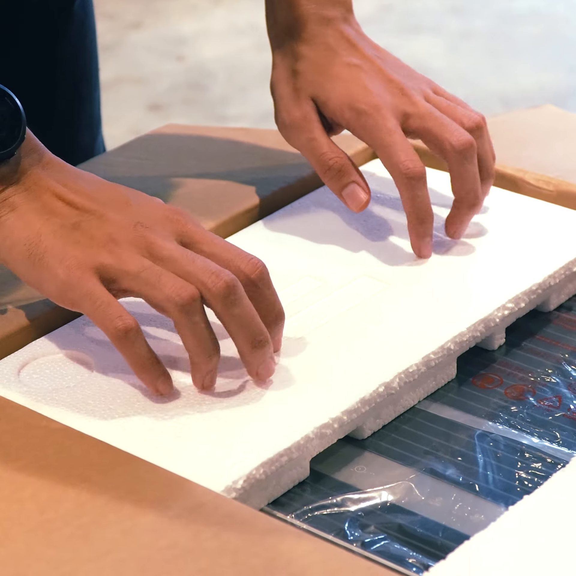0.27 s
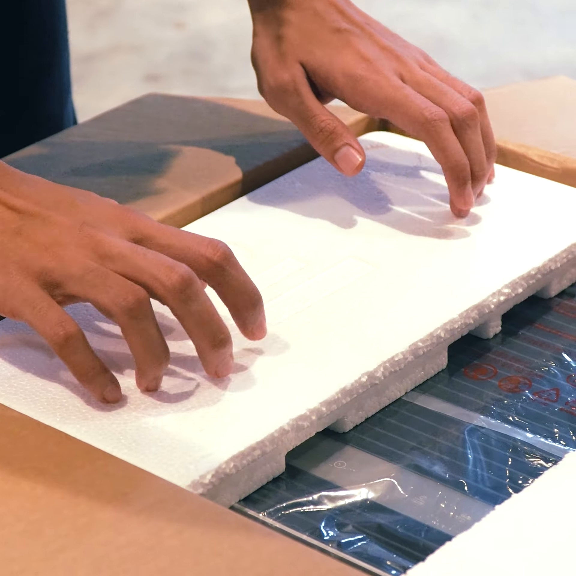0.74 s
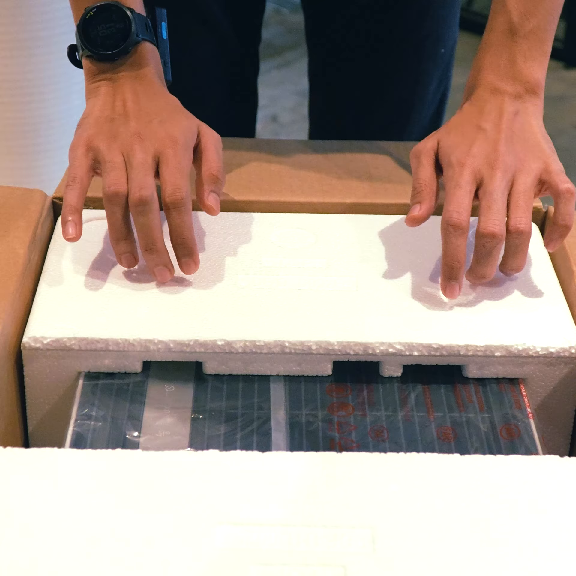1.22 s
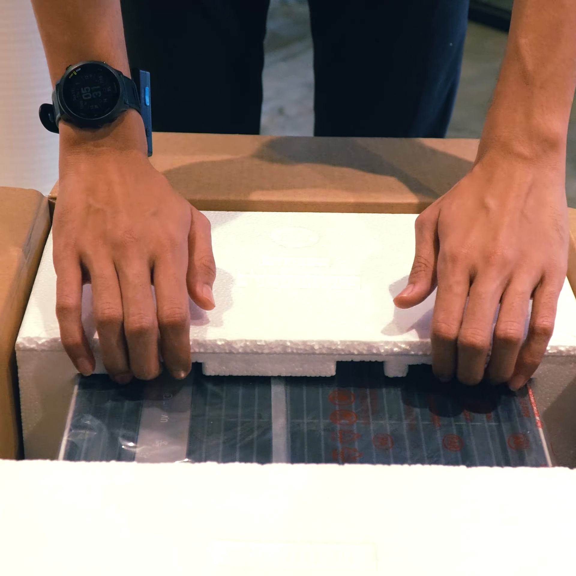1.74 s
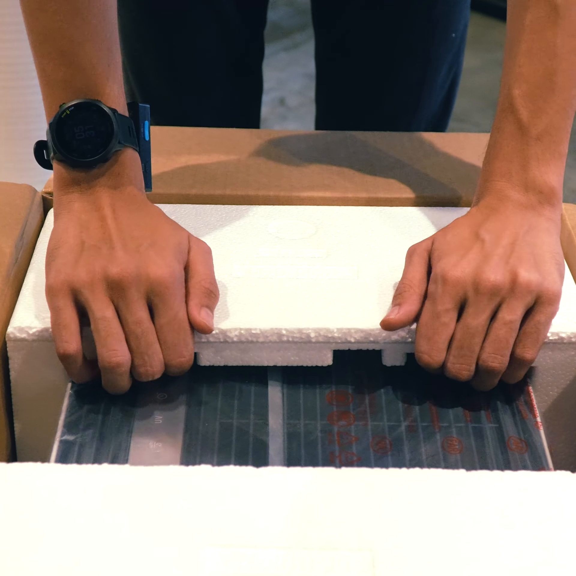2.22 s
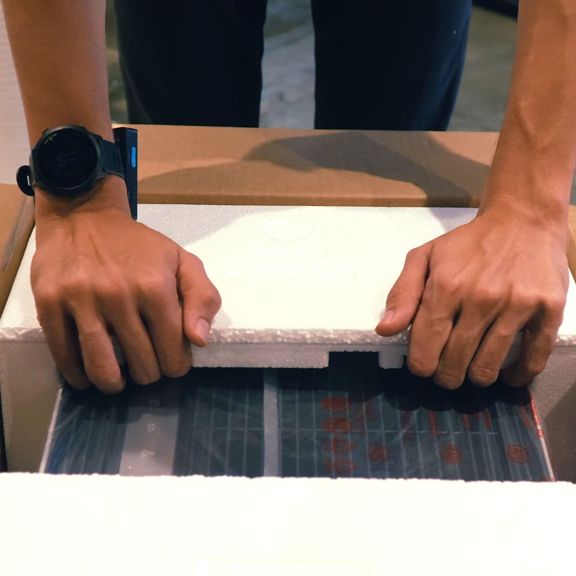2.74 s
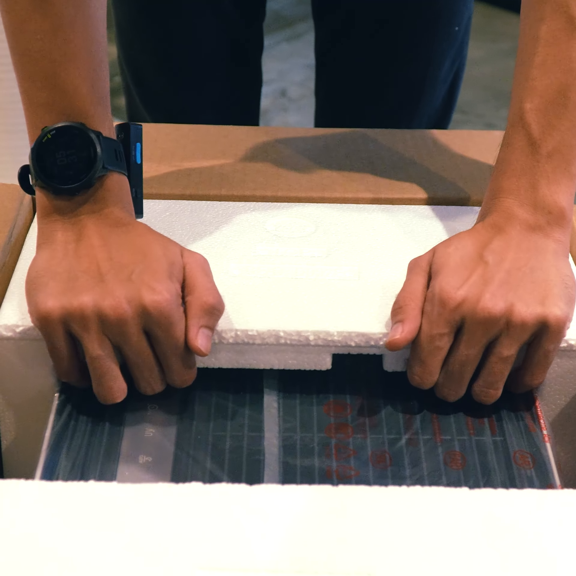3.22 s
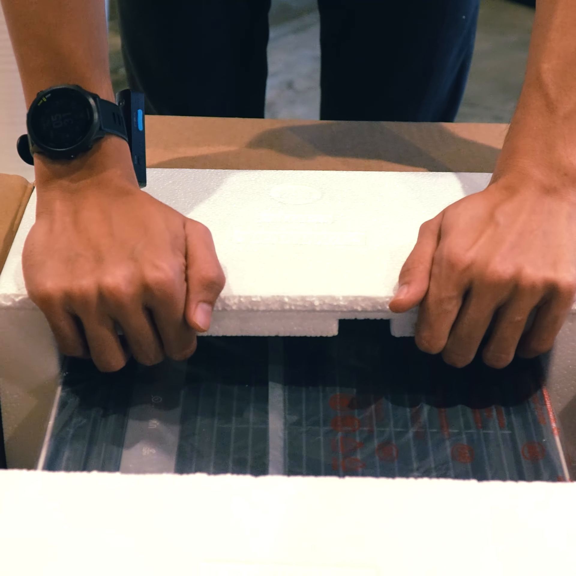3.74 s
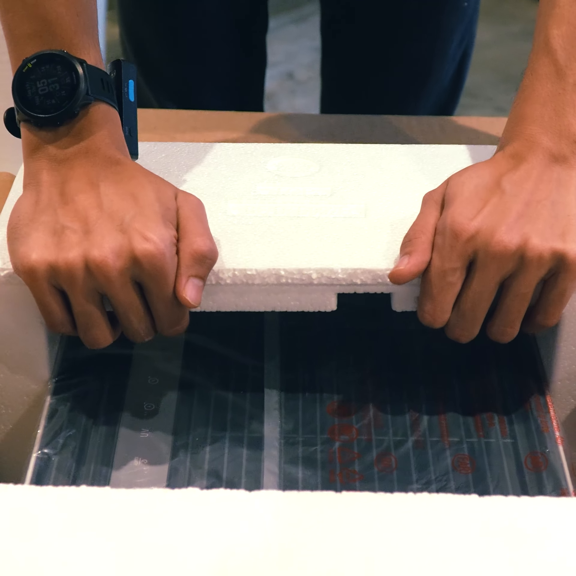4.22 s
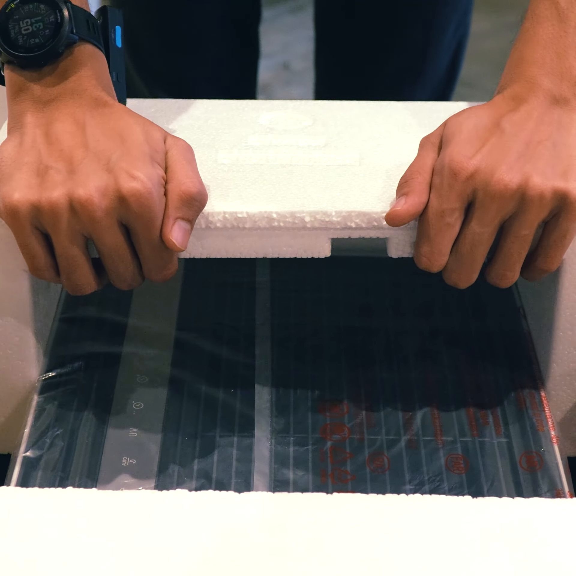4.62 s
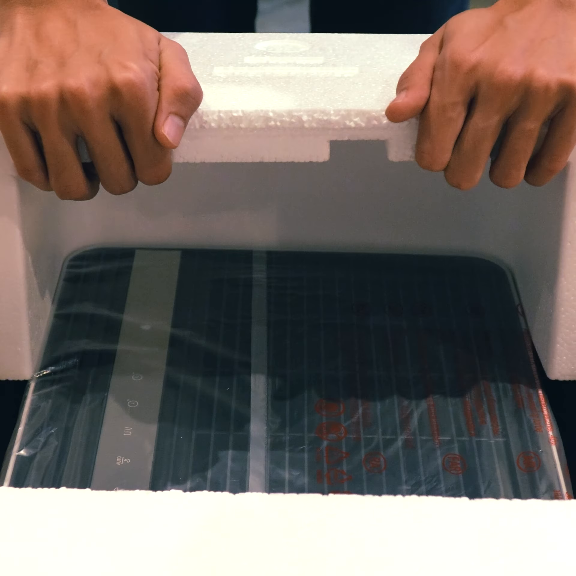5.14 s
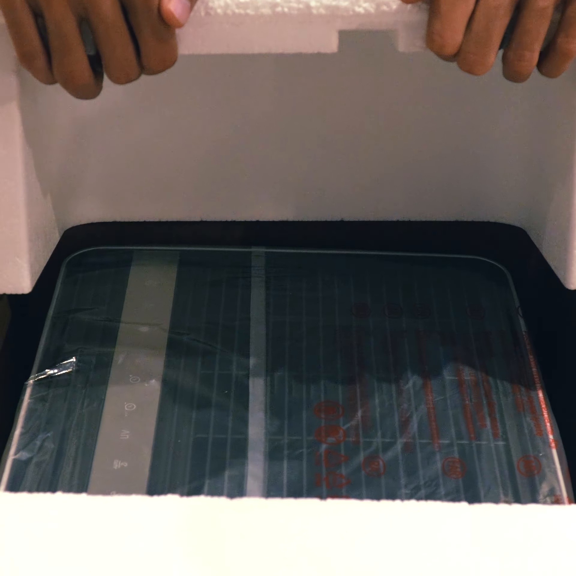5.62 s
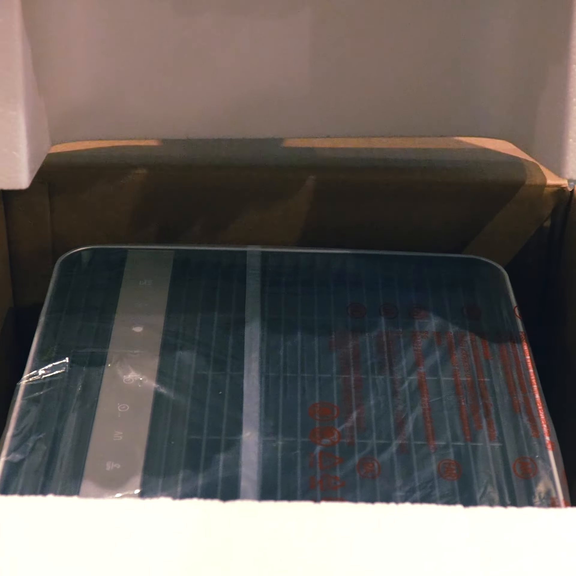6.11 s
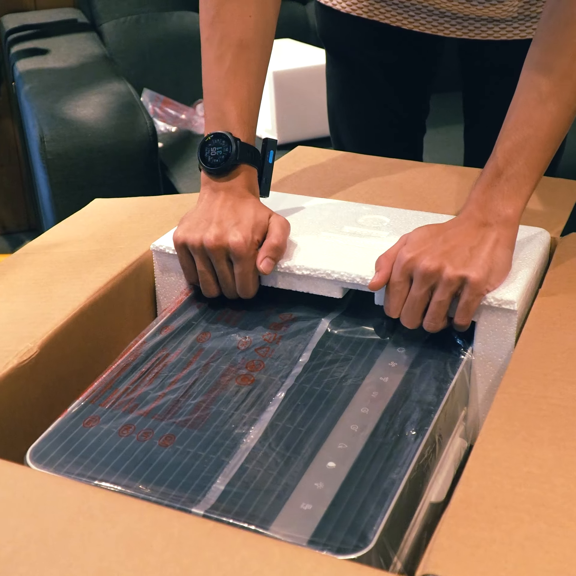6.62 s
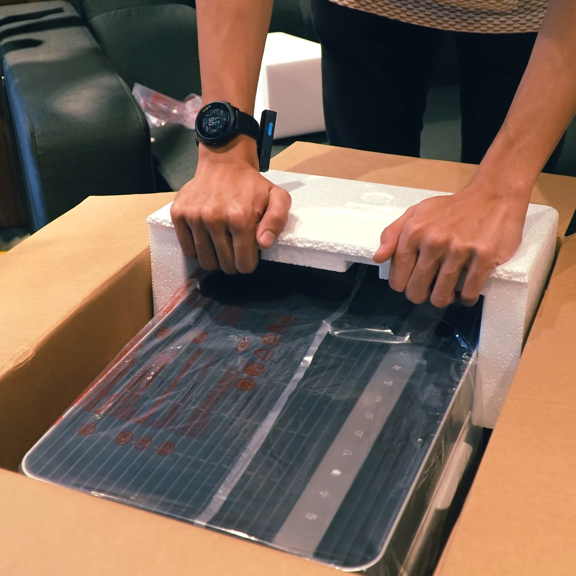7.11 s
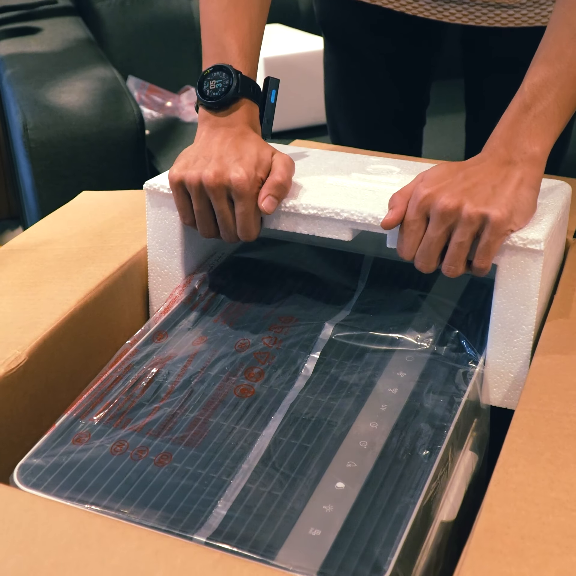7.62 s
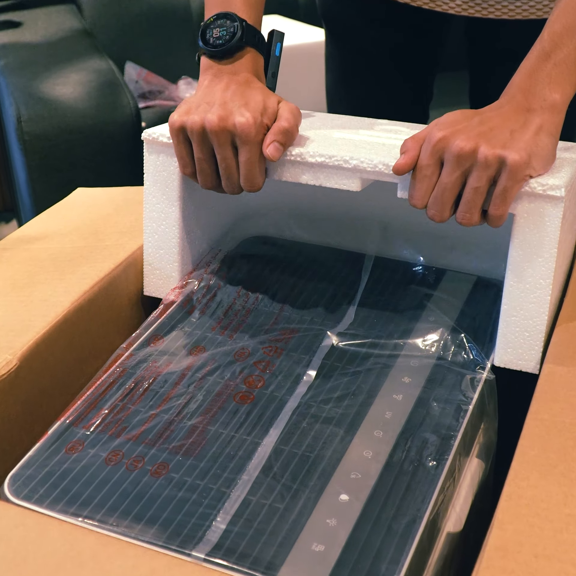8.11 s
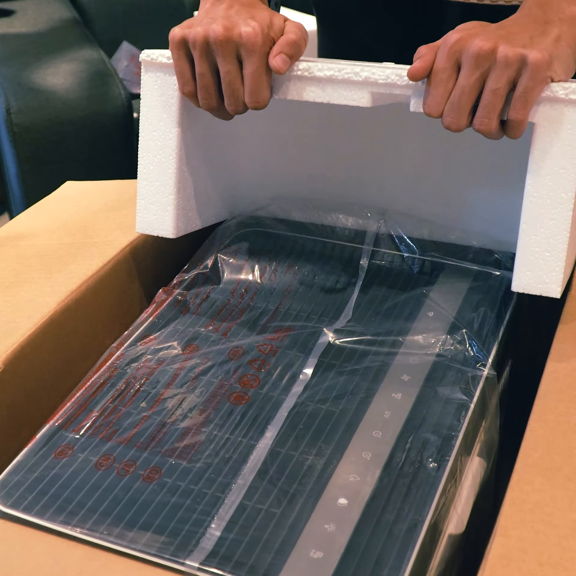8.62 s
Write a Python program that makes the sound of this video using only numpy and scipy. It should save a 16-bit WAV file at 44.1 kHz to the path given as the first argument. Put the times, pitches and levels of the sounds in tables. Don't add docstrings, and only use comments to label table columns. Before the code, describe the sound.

Indoors, close microphone, faint room hum and hiss with a short, slight room tail. From 0.1 to 1.1 s, fingertips drum unevenly on a foam slab: about twenty low, hollow, quickly damped thumps with nail ticks and brief scuffs. Soft box knocks come at 1.2 and 1.45 s. From 1.6 s foam scuffs brightly against cardboard, with a cluster of hard creaks around 2.0-2.4 s and the strongest wall knock at 2.3 s. It thins to small ticks, then a low rubbery groan near 3.1-3.25 s and a sharp squeaky pluck at 3.35 s. A dense, gritty drag hisses, stuttering around 4 s, then steadily until 6.05 s, stopping abruptly. After light creaks at 6.3 s, a second long scrape runs from 6.5 s to the end, with low box knocks at 6.5 and 7.5 s and tiny, very high squeaks around 8.6 s.

```python
import sys
import numpy as np
from scipy import signal
from scipy.fft import rfft, irfft
from scipy.io import wavfile
from scipy.ndimage import uniform_filter1d

SR = 44100
rng = np.random.default_rng(int(sys.argv[2]) if len(sys.argv) > 2 else 0)


def attenuation_scalar(level_db):
    decades = np.asarray(level_db, float) / 20
    return 10 ** decades


def digitize_waveform(pressure):
    field = np.atleast_2d(pressure).T
    bounded = np.clip(field, -1, 1)
    quanta = np.round(bounded * 32767).astype(np.int16)
    wavfile.write(sys.argv[1], SR, quanta)


N = 390726

# frequency in Hz, level in dB.
AIR_SPECTRUM = [(18, -32), (30, -23), (364, -2), (666, -1.5), (1010, 14), (1670, -13), (2060, -13.5),
                (3400, -18), (3980, -21), (5310, -42), (16000, -70)]
# frequency in Hz, t60 in seconds.
ROOM_DECAY = [(100, 0.22), (1000, 0.75), (4000, 0.18), (12000, 0.37)]
# frequency in Hz, level in dB.
CARTON_SPECTRUM = [(30, -21), (55, -2), (85, 0), (120, -3.5), (160, -4), (230, -8.5), (400, -35.5),
                   (1000, -83)]
# time in seconds, level in dB.
SHAKE_LEVEL = [(0.0, -44), (1.19, -44), (1.21, -30), (1.24, -33), (1.33, -46), (1.42, -28.5), (1.43, -26),
               (1.47, -27), (1.48, -35), (1.54, -18), (1.61, -44), (1.66, -33), (1.75, -49), (1.88, -49),
               (1.97, -29.5), (2.08, -51), (2.1, -38), (2.25, -36), (2.29, -17), (2.36, -23), (2.42, -19.5),
               (2.5, -46), (2.62, -44), (2.68, -50), (2.94, -49), (3.18, -42), (3.4, -55), (3.66, -46),
               (3.95, -53), (5.46, -59), (5.62, -49), (6.01, -65), (6.07, -39), (6.13, -56), (6.26, -55),
               (6.36, -40), (6.46, -38), (6.53, -23.5), (6.61, -33.5), (6.69, -31), (6.77, -54),
               (6.96, -60), (7.06, -32), (7.18, -49), (7.25, -38), (7.32, -58), (7.38, -45), (7.41, -35),
               (7.5, -23.5), (7.52, -25), (7.55, -41), (7.66, -51), (7.77, -33), (7.85, -44), (8.86, -58.5)]
# start in seconds, peak in dB, pitch in Hz.
WALL_KNOCKS = [
    (1.211, -21, 96),
    (1.443, -11.5, 154),
    (1.502, -11, 86),
    (2.291, -4, 157),
    (2.41, -11, 140),
    (6.053, -19, 72.7),
    (6.513, -16, 182),
    (7.479, -12, 161),
    (7.744, -24, 91.5),
]
# start in seconds, length in seconds, start in Hz, end in Hz, level in dB.
FILM_SQUEALS = [
    (8.56, .025, 10800, 10700, -32),
    (8.592, .033, 11000, 10900, -26),
    (8.638, .02, 11300, 10300, -19),
    (8.654, .014, 10500, 14000, -25),
    (8.85, .01, 10600, 10600, -34),
    (.04, .07, 4200, 4200, -52),
]
# start in seconds, thump in dB, slab pitch in Hz, ring t60 in seconds.
FINGER_TAPS = [(0.112, -11.5, 266, 0.045), (0.125, -7, 162, 0.052), (0.165, -19.5, 180, 0.05),
               (0.291, -18, 248, 0.036), (0.3, -7, 173, 0.046), (0.311, -9.5, 182, 0.023),
               (0.343, -15, 170, 0.045), (0.465, -5.5, 256, 0.052), (0.534, -11, 178, 0.056),
               (0.55, -10.5, 215, 0.037), (0.63, -8.5, 167, 0.064), (0.645, -1, 215, 0.023),
               (0.768, -8.5, 228, 0.026), (0.799, -26, 213, 0.041), (0.847, -15.5, 186, 0.066),
               (0.859, -19, 197, 0.074), (0.901, -13.5, 185, 0.044), (0.975, -7, 217, 0.022),
               (1.001, -11.5, 300, 0.048), (1, -1.5, 194, 0.035), (1.094, -13, 222, 0.029)]
# start in seconds, peak in dB, pitch in Hz, crackle in dB.
STICK_CREAKS = [(0.125, -10.5, 1080, -15.5), (0.164, -16, 1080, -28), (0.229, -13, 5870, -22),
                (0.296, -17, 2770, -20), (0.307, -20, 700, -25), (0.347, -15.5, 1130, -24),
                (0.373, -22, 2100, -21), (0.418, -40, 1100, -31), (0.466, -11.5, 2700, -20.5),
                (0.533, -15, 1170, -18), (0.635, -16, 980, -26), (0.767, -23, 700, -24),
                (0.799, -40, 1130, -36.5), (0.843, -29, 2660, -32), (0.859, -19, 2600, -23),
                (0.9, -14, 1080, -25), (0.977, -11, 780, -46), (1.0, -17, 923, -27),
                (1.093, -19, 1970, -31), (1.206, -41, 781, -66), (1.954, -12, 910, -17),
                (2.008, -5, 1190, -22), (2.044, -7, 1140, -14), (2.062, -6, 1170, -17),
                (2.186, -5, 4760, -18), (2.341, -7, 1250, -22), (2.374, -10, 670, -34),
                (2.391, -6, 850, -24), (2.404, -11, 870, -29), (2.502, -17, 1100, -18),
                (2.513, -28, 4000, -25), (2.513, -13, 1130, -19), (2.538, -21.5, 412, -33),
                (2.565, -22, 1000, -30), (2.589, -20, 405, -18), (2.674, -41, 1210, -33),
                (2.708, -35, 2830, -33), (2.742, -33, 3450, -41), (2.767, -31, 2930, -28),
                (2.783, -27, 3350, -48.5), (2.808, -18, 1110, -20), (2.845, -13, 3100, -21),
                (2.861, -11, 3550, -20), (2.885, -21, 3330, -18.5), (2.903, -17, 3770, -26),
                (2.987, -22.5, 1110, -26), (3.047, -22, 423, -39), (3.083, -31, 323, -32),
                (3.101, -23, 303, -36), (3.121, -18, 327, -30), (3.147, -18, 487, -26),
                (3.161, -8.5, 697, -35), (3.185, -14, 530, -25), (3.222, -9, 760, -22),
                (3.24, -7.5, 700, -40), (3.281, -10, 3330, -29), (3.326, -11.5, 3370, -19),
                (3.351, -1, 3330, -22), (4.894, -7, 910, -20), (6.281, -40, 1070, -31),
                (6.289, -21.5, 970, -41), (6.313, -30, 1030, -44), (6.353, -25, 1080, -27.5),
                (6.365, -19, 996, -31), (6.375, -17, 3300, -32.5)]
# time in seconds, drag level in dB.
DRAG_LEVEL = [(0.0, -64), (0.102, -53), (0.128, -29), (0.15, -42), (0.235, -32), (0.279, -54), (0.294, -31),
              (0.303, -27), (0.329, -54), (0.387, -27.5), (0.405, -47), (0.425, -44), (0.445, -61),
              (0.453, -54), (0.466, -27), (0.497, -55), (0.569, -37), (0.616, -60), (0.636, -27.5),
              (0.662, -44.5), (0.752, -56.5), (0.77, -50), (0.786, -60), (0.834, -56), (0.858, -36.5),
              (0.874, -51), (0.907, -33), (0.932, -52), (0.964, -63), (0.974, -33), (0.984, -29),
              (0.988, -58), (1.004, -25), (1.02, -45), (1.058, -59), (1.102, -33), (1.177, -59),
              (1.54, -64), (1.603, -24), (1.644, -38.5), (1.67, -22), (1.686, -27.5), (1.722, -19),
              (1.78, -28.5), (1.846, -30.5), (1.88, -26.5), (1.915, -17.5), (1.964, -28), (2.009, -22),
              (2.077, -29), (2.103, -24), (2.143, -30.5), (2.185, -25), (2.231, -25.5), (2.413, -29.5),
              (2.484, -40.5), (2.51, -30.5), (2.558, -40.5), (2.616, -27.5), (2.664, -46.5), (2.682, -19),
              (2.856, -42.5), (2.867, -32), (2.909, -33), (2.943, -52), (2.993, -40.5), (3.134, -49.5),
              (3.275, -23.5), (3.314, -29), (3.352, -14.5), (3.37, -22), (3.414, -14.5), (3.514, -18),
              (3.674, -21.5), (3.775, -33.5), (3.819, -22.5), (3.865, -43), (3.897, -22), (3.918, -18),
              (3.945, -45), (3.971, -55), (3.991, -21.5), (4.017, -14), (4.043, -43), (4.065, -63),
              (4.075, -28), (4.115, -23.5), (4.206, -17.5), (4.252, -20.5), (4.348, -17), (4.404, -25.5),
              (4.564, -21.5), (4.618, -25), (4.731, -22), (4.765, -26), (4.809, -22), (5.244, -21),
              (6.05, -15.5), (6.065, -19.5), (6.072, -41), (6.196, -56), (6.274, -63), (6.288, -42),
              (6.344, -61), (6.374, -29.5), (6.425, -46), (6.475, -20.5), (6.509, -29), (6.561, -17),
              (6.82, -15), (6.988, -17.5), (7.026, -15), (7.078, -23.5), (7.112, -17.5), (7.148, -21),
              (7.279, -20.5), (7.325, -23), (7.365, -17), (7.407, -23.5), (7.788, -23), (7.824, -29),
              (7.976, -18.5), (8.157, -23), (8.261, -20), (8.86, -20)]
# time in seconds, body centre in Hz, groan, panel and fizz levels
# relative to the body in dB, notch gain in dB.
SLIDE_COLOUR = [(0.2, 5500, -14, -5, -6, -2.0), (0.38, 5860, -15.0, -3.0, -6.5, 0),
                (0.57, 4500, -10, -10, 2, 4), (0.7, 3900, -10, 3, 1, -3), (0.9, 3920, -21, -4.5, -3, -1),
                (1.13, 4040.0, -17, -7.0, -9.5, 4), (1.6, 5580.0, -26, 1.5, 2, -9),
                (1.72, 4800.0, -21.5, -2.5, -4, -8), (1.83, 5000, -25, -2.0, -2.0, -8),
                (1.92, 5100, -16.0, -3.5, -4.5, -11), (2.03, 4850, -11, -1.0, 0, -4),
                (2.15, 4500, -35, -9.5, -4, -4), (2.28, 4780.0, -9, -4, -6.0, -6.0),
                (2.4, 4680.0, -1, 0, -3, -5.0), (2.52, 4450.0, -13, 7.5, -1, -8),
                (2.62, 4450, -8.0, -16, -1.5, -1), (2.75, 4350, -20, -11, -4.0, -4.0),
                (2.88, 3400, -20.5, -8, -6, -2), (3.05, 4130.0, 4.5, -4.5, -6, -2),
                (3.17, 3560, 9, 5.5, -6, -6), (3.26, 3400, 2, -0.5, -13, -13),
                (3.4, 3570, -22.5, -11.5, -12, -7), (3.55, 3530.0, -16.5, -7.0, -12.0, -7),
                (3.7, 3920, -15.5, -1.5, -8, -5), (3.82, 3500, -22, -9.5, -11.5, -7),
                (4, 3320, -30, -14, -13.0, -11), (4.2, 3540, -38, -11, -9.5, -6.5),
                (4.45, 4350.0, -30, -10.0, -6.0, 0), (4.75, 4320.0, -26, -8.0, -9.5, -3.0),
                (4.9, 4320, -26, -5.0, -8.0, -3.5), (5.05, 4300, -30, -10.0, -8.0, 3),
                (5.3, 3560, -34, -10, -5, 1.5), (5.6, 3100, -32, -10, -14, 0),
                (5.85, 3300, -35, -12.5, -13.0, -0.5), (6.02, 3330.0, -39, -14, -7, -3.5),
                (6.3, 4340.0, 10, -1, 0, -6), (6.38, 3630, -11, -3.0, -12, -4.0),
                (6.5, 3860, -28, -15, -12.0, -8.5), (6.75, 3940, -40, -15.5, -10.0, -4),
                (7.1, 3560, -32.5, -17, -10, -7.0), (7.45, 3660, -23, -9.5, -8.5, -7.0),
                (7.8, 4070, -23.0, -12, -7, -8), (8, 4400, -31.0, -14.0, -9.5, 0),
                (8.2, 4200, -27, -10.5, -7, 1), (8.4, 3650, -37, -12, -7.0, 2),
                (8.55, 3140.0, -28, -10.5, -9.0, 1), (8.75, 3300, -29.0, -13.5, -13.5, -0.5)]
# frequency in Hz, level in dB.
BODY_SPECTRUM = [(880, -53), (1500, -12), (2220, -5.5), (2420, -2), (3170, -0.5), (3740, -1), (4130, -1.5),
                 (6420, -11.5), (7630, -18), (9000, -29), (11700, -97), (19800, -120)]
# frequency in Hz, level in dB.
GROAN_SPECTRUM = [(150, -15), (260, -1), (420, 2), (650, -2), (900, 4), (1500, -35)]
# frequency in Hz, level in dB.
PANEL_SPECTRUM = [(290, -52), (500, -74), (625, -16.5), (816, -5), (977, 1), (1580, 1), (1840, -5),
                  (2200, -3), (2860, -10), (4840, -120)]
# frequency in Hz, level in dB.
FIZZ_SPECTRUM = [(3530, -19), (6000, -7.5), (6730, -9.5), (7800, -7.5), (9780, -10.5), (11100, -13),
                 (13700, -21.5), (16000, -26)]


def evened(x, axis=None):
    return x / np.sqrt(np.mean(abs(x) ** 2, axis=axis, keepdims=True) + 1e-20)


def read(points, hz):
    points_hz, value = np.transpose(points)
    return np.interp(np.log(hz + 1), np.log(points_hz + 1), value)


def over_time(points):
    return attenuation_scalar(np.interp(np.arange(N) / SR, *np.transpose(points)))


def coloured(x, spectrum):
    gain = attenuation_scalar(read(spectrum, np.fft.rfftfreq(N, 1 / SR)))
    return evened(irfft(rfft(x) * gain, N))


def add(mix, start_s, sound):
    part = mix[round(start_s * SR):][:len(sound)]
    part += sound[:len(part)]


def ring(hz, t60_s, rise_s):
    t = np.arange(round(1.4 * t60_s * SR) + 50) / SR
    shape = attenuation_scalar(-60 * t / t60_s) * (1 - np.exp(-t / rise_s))
    return shape / shape.max() * np.sin(2 * np.pi * hz * t)


def puff(t60_s, lo_hz, hi_hz):
    t = np.arange(4000) / SR
    band = signal.butter(2, [lo_hz, hi_hz], "band", fs=SR)
    noise = evened(signal.lfilter(*band, rng.standard_normal(len(t))))
    return noise * attenuation_scalar(-60 * t / t60_s) * (1 - np.exp(-t / 0.0012))


def resonate(x, hz, width_hz):
    turn = np.exp(2j * np.pi * np.cumsum(hz * np.ones(len(x))) / SR)
    pole = np.exp(-np.pi * width_hz / SR)
    smooth = signal.lfilter([1 - pole], [1, -pole], x / turn + 1e-18)
    return 2 * (turn * smooth).real


def jolts(per_s, spread_db):
    sizes = attenuation_scalar(spread_db * np.minimum(rng.exponential(1, N), 4))
    happens = rng.random(N) < per_s / SR
    return evened(sizes * happens * rng.standard_normal(N))


def air():
    return attenuation_scalar(-57.5) * coloured(rng.standard_normal(N), AIR_SPECTRUM)


def room(x):
    tail = np.zeros(SR // 2)
    at = np.arange(200, len(tail) - 20, 20)
    tail[at + rng.integers(0, 20, len(at))] = rng.choice([-1., 1.], len(at))
    hz, t, z = signal.stft(tail, SR, nperseg=256)
    decay = attenuation_scalar(-60 * t / read(ROOM_DECAY, hz)[:, None])
    tail = signal.istft(z * decay, SR, nperseg=256)[1]
    return signal.fftconvolve(x, tail / np.linalg.norm(tail))[:N]


def box():
    out = coloured(jolts(300, 2.6), CARTON_SPECTRUM) * over_time(SHAKE_LEVEL)
    for start_s, db, hz in WALL_KNOCKS:
        add(out, start_s, attenuation_scalar(db - 6.5) * ring(hz, 0.14, 0.0018))
    return out


def squeals():
    out = np.zeros(N)
    for start_s, length_s, from_hz, to_hz, db in FILM_SQUEALS:
        hz = np.linspace(from_hz, to_hz, round(length_s * SR))
        width_hz = 0.11 * from_hz
        tone = resonate(rng.standard_normal(len(hz)), hz, width_hz)
        tone = resonate(tone, hz, width_hz)
        add(out, start_s, attenuation_scalar(db) * evened(tone) * signal.windows.tukey(len(hz), 0.6))
    return out


def taps():
    out = np.zeros(N)
    for start_s, db, hz, t60_s in FINGER_TAPS:
        boom = ring(hz, max(t60_s, 0.015), 0.0016)
        box_mode = ring(226 * rng.uniform(0.93, 1.2), 0.17, 0.0049)
        dull_knock = ring(420 * rng.uniform(0.845, 1.14), 0.06, 0.003)
        paper = puff(0.13, 740, 1330)
        add(out, start_s, attenuation_scalar(db + 1.0) * boom)
        add(out, start_s, attenuation_scalar(db - 15.0) * box_mode)
        add(out, start_s, attenuation_scalar(db - 16.0) * dull_knock)
        add(out, start_s, attenuation_scalar(db - 23.5) * paper)
    return out


def creaks():
    out = np.zeros(N)
    for start_s, db, hz, crackle_db in STICK_CREAKS:
        pluck = ring(hz, 5 / hz + 0.003, 0.0003)
        add(out, start_s, attenuation_scalar(db - 2.0) * pluck)
        add(out, start_s, attenuation_scalar(crackle_db + 2.5) * puff(0.019, 2500, 10000))
    return out


def slide():
    judder = uniform_filter1d(uniform_filter1d(rng.standard_normal(N), 500), 500)
    judder_db = 0.82 * evened(judder)
    slips = np.stack([jolts(12000, 0.73), jolts(700, 2.1)]) * attenuation_scalar(judder_db)
    hz, t, (fine, coarse) = signal.stft(slips, SR, nperseg=512, noverlap=384)
    hz = hz[:, None]
    time_s, centre_hz, groan_db, panel_db, fizz_db, notch_db = np.transpose(SLIDE_COLOUR)

    def layer(spectrum, rel_db):
        return evened(attenuation_scalar(read(spectrum, hz))) * attenuation_scalar(np.interp(t, time_s, rel_db))

    body_hz = hz * 3600 / np.interp(t, time_s, centre_hz)
    body = evened(attenuation_scalar(read(BODY_SPECTRUM, body_hz)), axis=0)
    groan = layer(GROAN_SPECTRUM, groan_db)
    panel = layer(PANEL_SPECTRUM, panel_db)
    fizz = layer(FIZZ_SPECTRUM, fizz_db)

    patches = uniform_filter1d(rng.standard_normal(fine.shape), 5, 0)
    patches_db = 1.3 * evened(uniform_filter1d(patches, 20, 1))
    notch_hz, notch_width_hz = 2015, 380
    notch_shape = np.exp(-((hz - notch_hz) / notch_width_hz) ** 2)
    dip_db = 1.36 * (np.interp(t, time_s, notch_db) + 1.5) * notch_shape

    z = fine * np.sqrt(body ** 2 + panel ** 2 + fizz ** 2) + coarse * groan
    z = z * attenuation_scalar(patches_db + dip_db)
    hiss = signal.istft(z, SR, nperseg=512, noverlap=384)[1][:N]
    return hiss * over_time(DRAG_LEVEL)


def scene():
    near = box() + squeals() + taps() + creaks() + slide()
    return (near + attenuation_scalar(-23.5) * room(near) + air())[None]


def band_limit(x):
    return signal.sosfilt(signal.butter(12, 16430, fs=SR, output="sos"), x)


def record(dry):
    heard = signal.lfilter(*signal.butter(3, 55., "high", fs=SR), dry)
    ceiling = 0.55
    limited = ceiling * np.tanh(heard / ceiling)
    lowpass = signal.firwin(511, 15850, window=("kaiser", 9), fs=SR)
    mix = signal.oaconvolve(limited, lowpass[None], "same")
    return band_limit(mix)


dry = scene()
out = record(dry)
digitize_waveform(out)
```